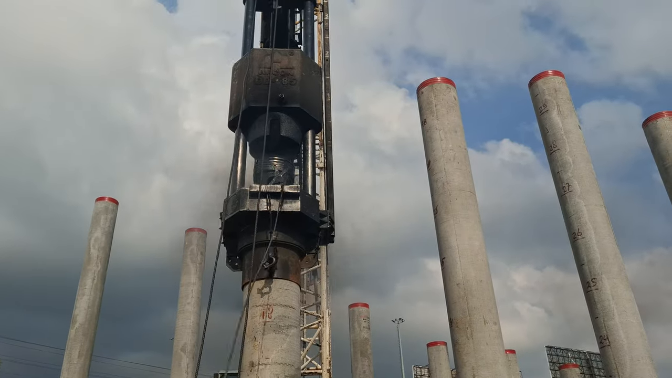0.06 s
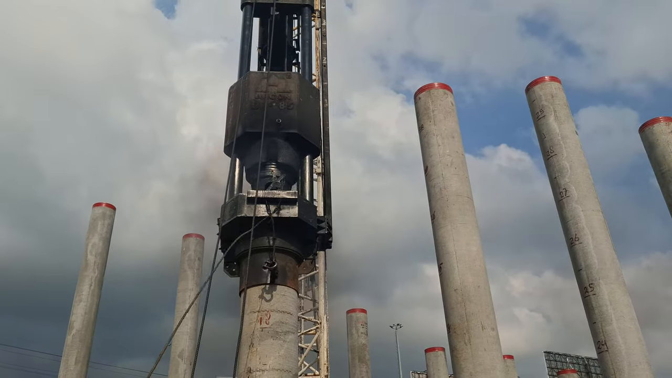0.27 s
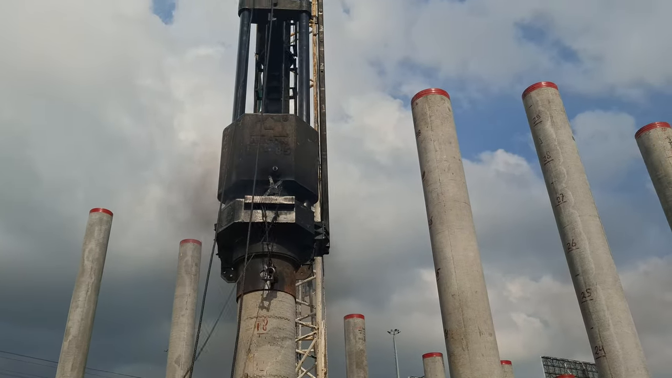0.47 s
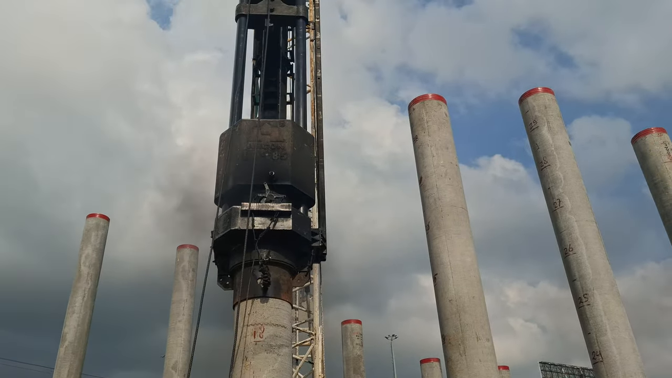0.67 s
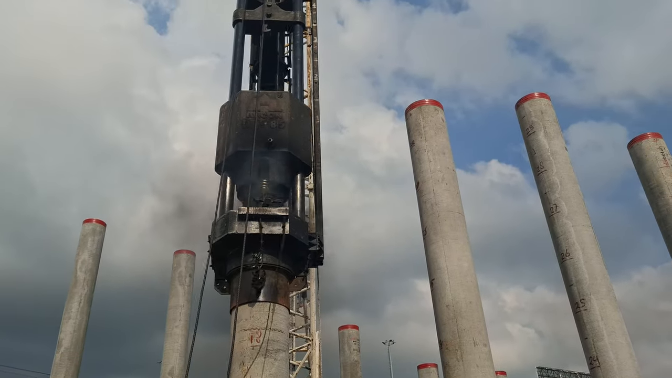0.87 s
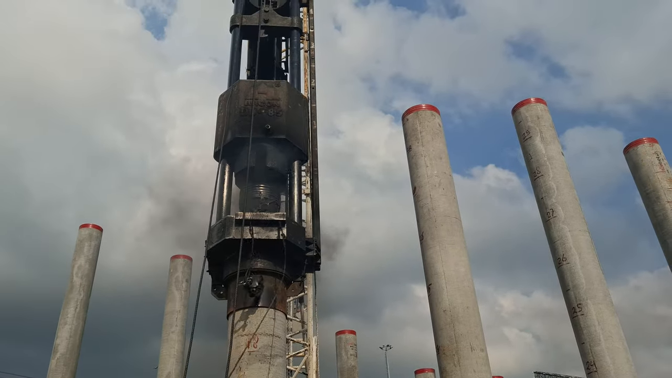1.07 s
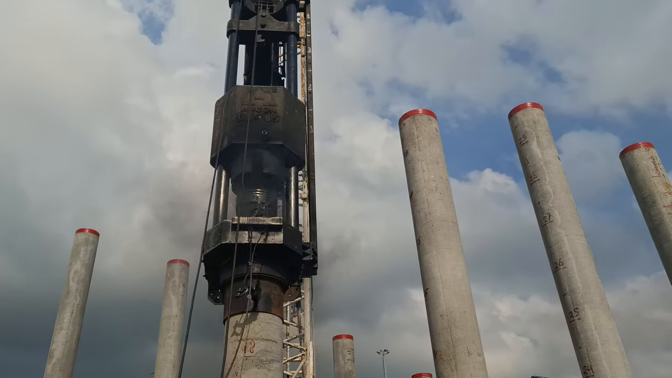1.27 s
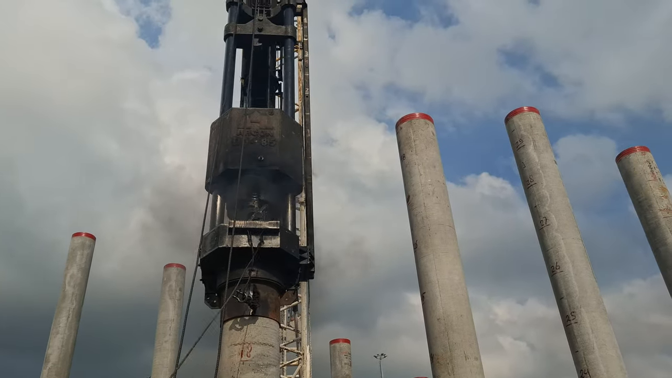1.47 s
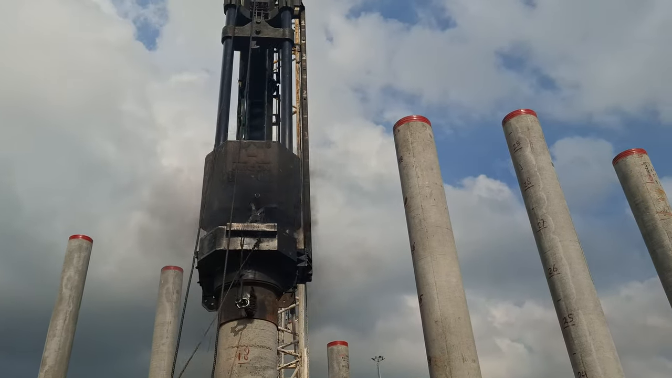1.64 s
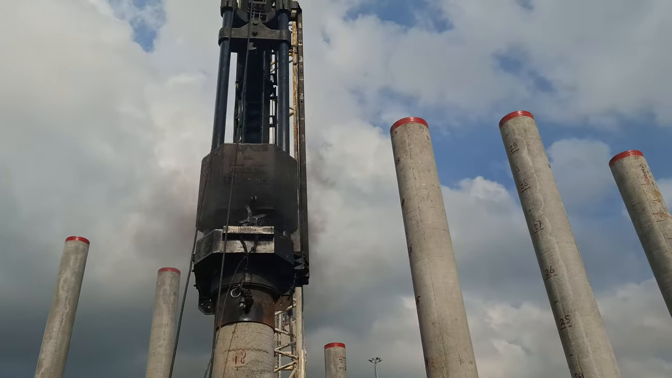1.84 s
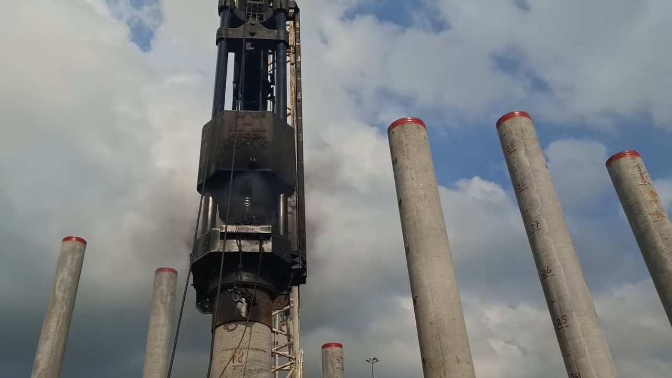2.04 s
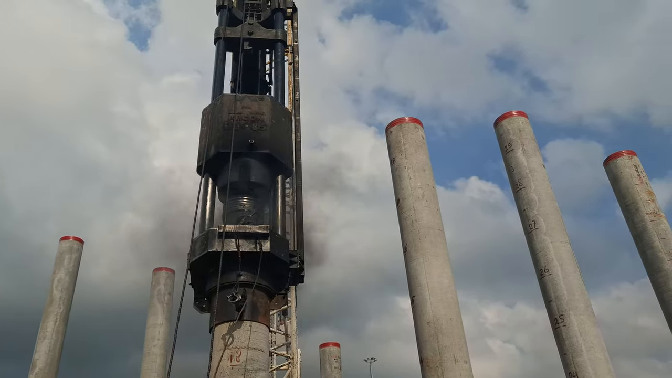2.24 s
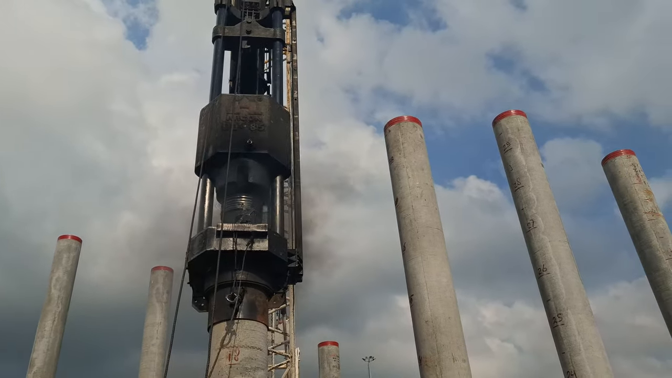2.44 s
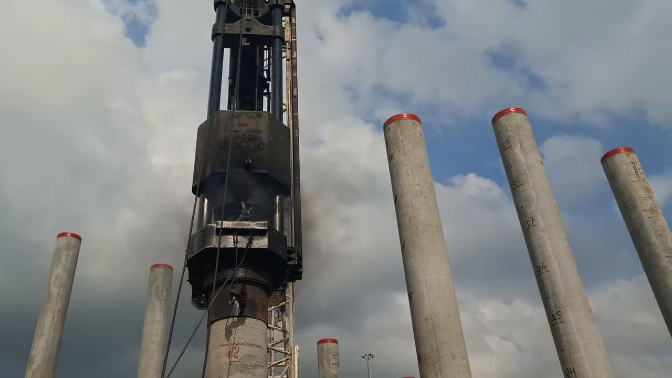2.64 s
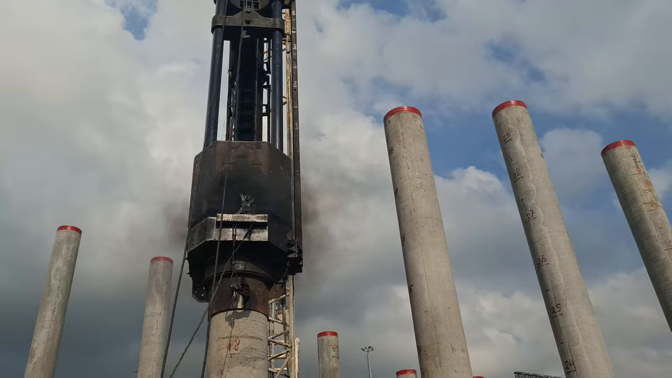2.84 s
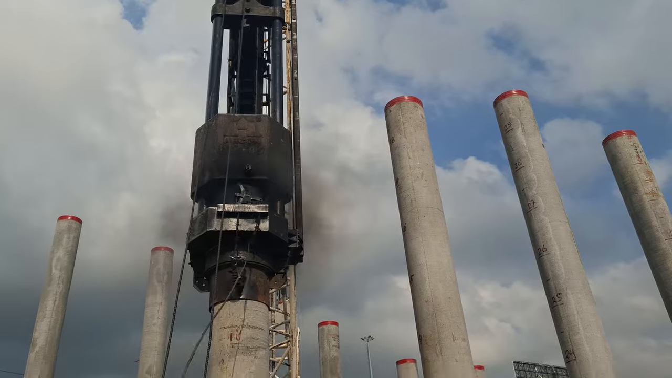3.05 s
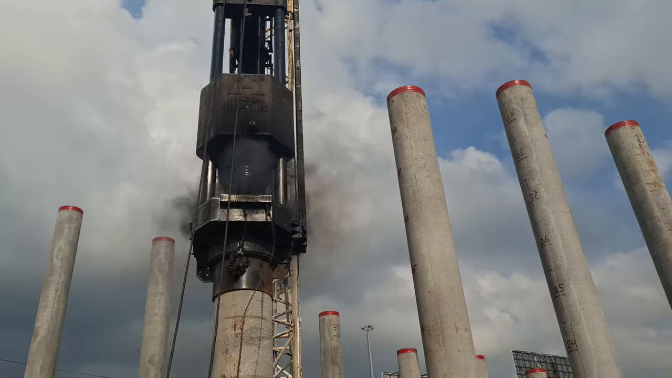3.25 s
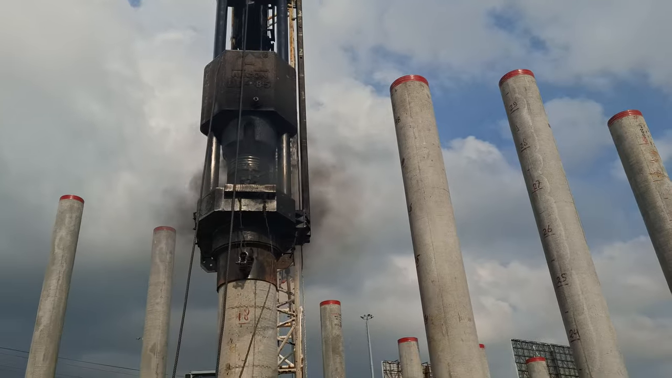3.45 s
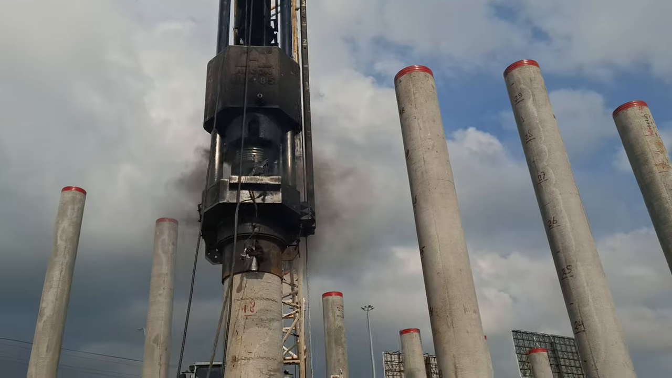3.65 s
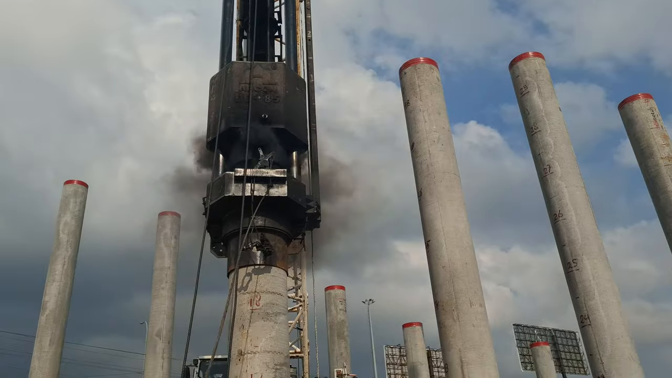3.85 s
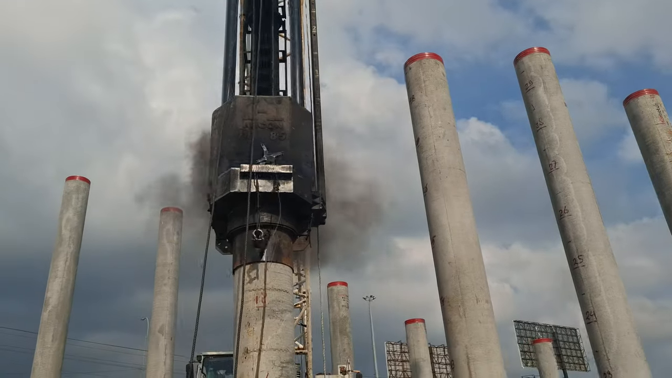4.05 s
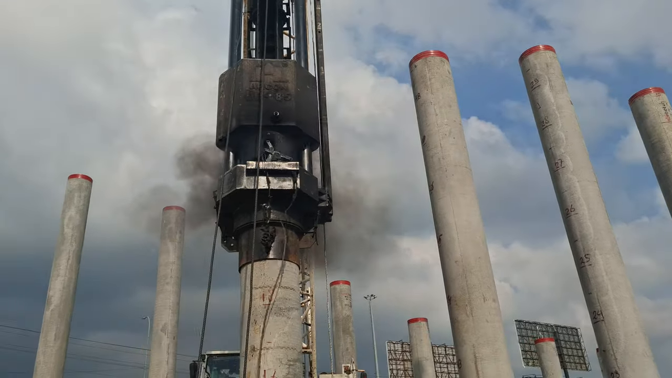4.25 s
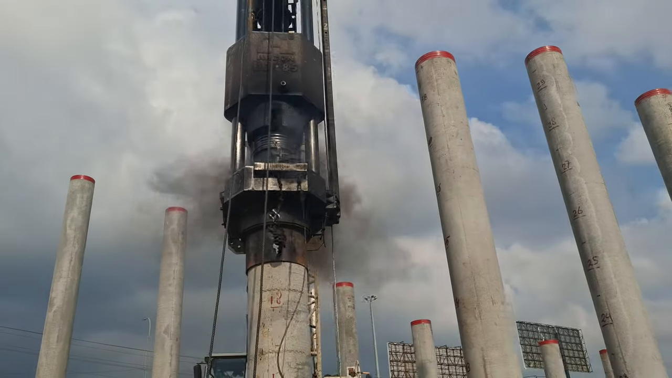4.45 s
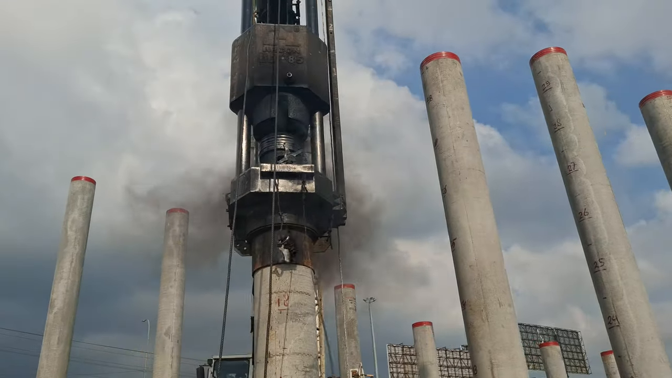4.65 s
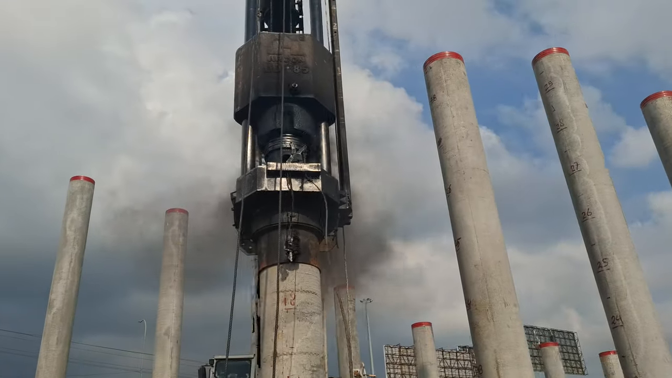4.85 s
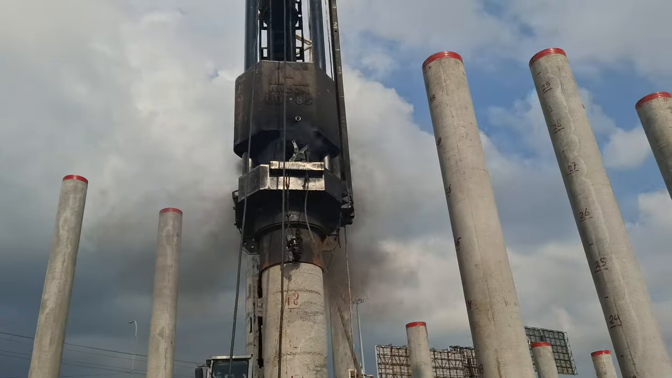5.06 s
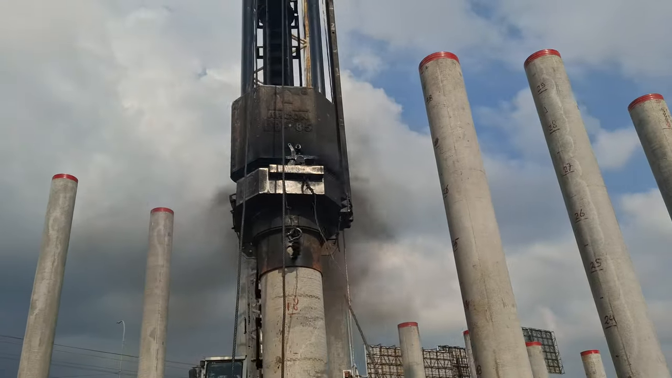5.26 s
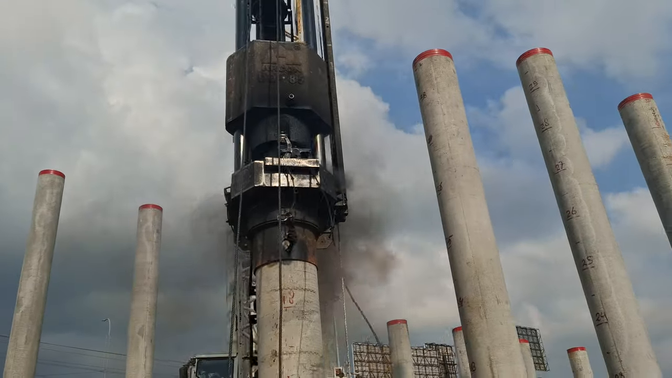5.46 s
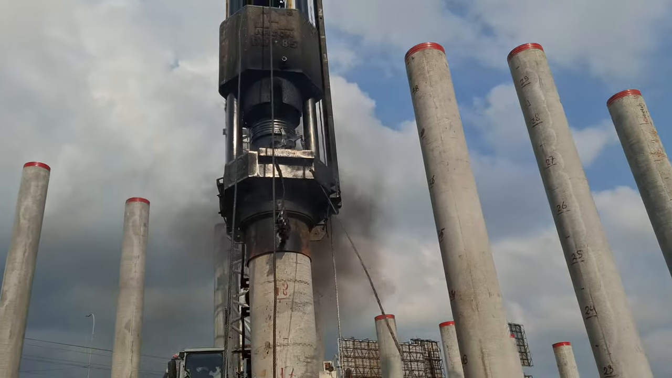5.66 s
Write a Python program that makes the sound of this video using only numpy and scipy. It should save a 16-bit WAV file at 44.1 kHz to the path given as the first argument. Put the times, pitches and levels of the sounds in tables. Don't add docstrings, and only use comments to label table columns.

```python
import sys
import numpy as np
from scipy import signal
from scipy.fft import rfft, irfft, next_fast_len
from scipy.io import wavfile
from scipy.ndimage import uniform_filter1d, map_coordinates

SR = 44100
rng = np.random.default_rng(int(sys.argv[2]) if len(sys.argv) > 2 else 0)


def voltage_ratio(decibels):
    exponent = np.asarray(decibels, float) / 20
    return 10 ** exponent


def master(y):
    cut = np.clip(np.atleast_2d(y).T, -1, 1)
    pcm = np.round(cut * 32767)
    wavfile.write(sys.argv[1], SR, pcm.astype(np.int16))


N = 252252
TIME = np.arange(N) / SR

# (time [s], peak [dB], low part [dB], high part [dB], boom [dB])
BLOWS = [
    (0.9022, -6.5, -0.5, -2.5, -31.5),
    (2.0857, -5.5, -1.5, -1, -27),
    (3.2473, -5.5, -3, -2.5, -25.5),
    (4.4016, -4.5, -0.5, -2.5, -27.5),
    (5.5437, -7.5, -0.5, -0.5, -33.5),
]


def unit(x):
    return x / np.sqrt(np.mean(x ** 2) + 1e-20)


def along(points, hz):
    f, v = np.transpose(points)
    return np.interp(np.log(hz + 1), np.log(f + 1), v)


def wobble(rate_hz):
    return map_coordinates(rng.standard_normal(int(N * rate_hz / SR) + 4), [TIME * rate_hz])


def filtered(x, response):
    size = next_fast_len(N + SR // 2)
    return irfft(rfft(x, size) * response(np.fft.rfftfreq(size, 1 / SR)), size)[..., :N]


def steel_noise(spectrum, patch_db, grit_db):
    impacts = voltage_ratio(grit_db * wobble(700)) * rng.standard_normal((2, N))
    z = signal.stft(impacts, nperseg=256)[2]
    parts = uniform_filter1d(rng.standard_normal(z.shape[1:]), size=2, axis=0)
    parts = uniform_filter1d(parts, size=10, axis=1)
    grit = signal.istft(z * voltage_ratio(patch_db * unit(parts)), nperseg=256)[1][:, :N]
    return unit(filtered(grit, lambda f: voltage_ratio(along(spectrum, f))))


def three_bands(gains, ring_db, patch_db, grit_db):
    # (frequency [Hz], density [dB per Hz])
    middle = [(900, -25), (1400, -4), (2000, 2), (3200, 1.5), (4700, 0.5), (5600, -8), (8000, -22)]
    low = [(60, -7), (150, -4), (300, -2), (650, 3), (930, 0.5), (1280, 0), (1700, -3.5), (2500, -28)]
    high = [(3500, -26), (5500, 11), (7000, 4), (8500, 4.5), (10500, -1.5), (13000, 0), (16000, -14)]
    # (frequency [Hz], width [Hz], level [dB])
    resonances = [(432, 39.6, -17), (595, 21, -9), (754, 16, -11.5), (914, 8.9, -29), (1157, 87, -9.5),
                  (1297, 31, -4), (1931, 69, -7), (2210, 5, -1), (2407, 7.9, -3), (2727, 23, -1.5),
                  (3024, 17, -6.5), (3567, 16, -7),
                  (4170, 17, -10), (4600, 14, -6.5), (6000, 18, -10.5), (6660, 33, -9), (8500, 36, -11.5),
                (9700, 30, -11), (11000, 38, -3.5), (12150, 63, -5)]
    force = np.zeros((2, N))
    for gain, band, share in zip(gains, (middle, low, high), (1, 1, .7)):
        force += gain * steel_noise(band, patch_db * share, grit_db)

    def response(f):
        ring = sum(voltage_ratio(db) * 1j * f * width / (hz * hz - f * f + 1j * f * width)
                   for hz, width, db in resonances)
        return 1 + voltage_ratio(ring_db) * ring
    return filtered(force, response)


def bursts(events, rise_s, hold_s, t60s, trim_db):
    power = np.zeros((3, N))
    for s, db, low_db, high_db, *_ in events:
        start = round(s * SR)
        t = TIME[:min(N - start, SR // 4)]
        rise = 1 - np.exp(-t / rise_s)
        for part, rel_db, t60 in zip(power, (0, low_db, high_db), t60s):
            level_db = db + rel_db + trim_db - 60 * np.clip(t - hold_s, 0, None) / t60
            part[start:start + len(t)] += (voltage_ratio(level_db) * rise) ** 2
    return power


def sliding(peaks, rule, fade_s, flutter_db, **grain):
    gains = np.zeros((3, N))
    for s, db, low_db, high_db in peaks:
        t = TIME - s
        for gain, rel_db, (swell_s, swell_db, hold_s, drop_db, release) in zip(gains, (0, low_db, high_db), rule):
            after = np.clip(t - hold_s, 0, None)
            shape_db = swell_db * np.clip(t / swell_s, -1, 0)
            shape_db = shape_db - drop_db * np.clip(after / .025, 0, 1) - release * after
            gain += np.clip((t + swell_s) / fade_s + 1, 0, 1) * voltage_ratio(db + rel_db + shape_db)
    flutter = np.array([wobble(45), wobble(30), wobble(70)])
    return three_bands(gains * voltage_ratio(flutter_db * flutter), **grain)


def ringing(s, modes, attack_s):
    out, start = np.zeros(N), round(s * SR)
    t = TIME[:min(N - start, round(SR * max(mode[2] for mode in modes)))]
    tones = sum(voltage_ratio(db - 60 * t / t60) * np.sin(2 * np.pi * hz * t) for hz, db, t60 in modes)
    out[start:start + len(t)] = (1 - np.exp(-t / attack_s)) * tones
    return out


def site():
    # (time [s], level [dB])
    rumble = [(0, -62), (.8, -47), (1.6, -61.5), (2.6, -44), (3.7, -41), (4.3, -37), (5.3, -43.5),
              (5.72, -39)]
    # (time [s], plant [dB], far clatter [dB])
    steady = [(0, -41, -46.5), (.4, -52, -57), (1, -51, -45.5), (1.548, -50, -53.5), (2.5, -44, -50),
              (3.699, -44.5, -46.5), (4.802, -46, -45), (5.72, -41.5, -38)]
    # (frequency [Hz], density [dB per Hz])
    ground_colour = [(18, -28), (35, -14.5), (60, 10), (80, 0.5), (110, -6.5), (200, -92)]
    plant_colour = [(60, -54), (110, 7), (200, -0.5), (400, -12.5), (700, -11), (1200, -45.5)]
    far_colour = [(180, -44), (300, -6), (343, -2), (3290, -20.5), (3830, -21.5), (6520, -26.5),
                  (8360, -34), (16000, -66)]
    s, plant_db, far_db = np.transpose(steady)
    blow_s = np.array([-.36] + [blow[0] for blow in BLOWS])
    since = TIME - blow_s[:, None]

    def stir(db, delay_s, t60_s):
        t = since - delay_s
        return np.sum(np.clip(t / 0.026, 0, 1) * voltage_ratio(db - 60 * np.abs(t) / t60_s), axis=0)

    ground = voltage_ratio(np.interp(TIME, *np.transpose(rumble))) + stir(-28, 0.071, 1.12)
    roar = stir(-26.5, -0.054, 0.36)
    plant = voltage_ratio(np.interp(TIME, s, plant_db)) + stir(-47, 0.14, 0.63) + roar
    far = voltage_ratio(np.interp(TIME, s, far_db)) + stir(-47.5, 0.13, 0.63)
    out = np.zeros((2, N))
    for gain, colour, patch_db in ((ground, ground_colour, 0), (plant, plant_colour, 2), (far, far_colour, 1)):
        out += gain * voltage_ratio(2.2 * wobble(14)) * steel_noise(colour, patch_db, grit_db=0)
    return out


def loose_pings():
    # (time [s], frequency [Hz], level [dB], t60 [s])
    pings = [(.075, 11000, -58, 0.11), (.16, 63, -25.5, 0.11), (0.193, 12050, -41.5, 0.067),
             (.235, 2180, -47, 0.12), (.3, 7800, -49, 0.06), (.357, 2210, -31, 0.039),
             (.372, 2100, -41.5, 0.12), (0.362, 60, -31, 0.11), (.8, 11350, -35, 0.24),
             (1.052, 2675, -22, 0.053), (1.301, 3830, -53, 0.6), (1.715, 7800, -43, 0.12),
             (2.088, 3570, 2.5, 0.02), (2.251, 1237, -26.5, 0.22), (3.04, 11500, -42, 0.14),
             (3.117, 2630, -18, 0.12), (3.349, 1610, -12.5, 0.037), (3.919, 8770, -18, 0.016),
             (3.92, 6250, -25, 0.026), (4.094, 3110, -8, 0.052), (4.18, 11200, -30, 0.14),
             (4.276, 2620, -15.5, 0.095), (4.36, 9700, -39, 0.075), (4.92, 9700, -51, 0.14),
             (5.35, 11500, -22, 0.13), (5.349, 4470, -19, 0.21), (5.415, 2680, -20.5, 0.17),
             (3.5, 11300, -51, .1)]
    return sum(ringing(s, [mode], 0.0045) for s, *mode in pings) * voltage_ratio(1.9 * wobble(90))


def loose_rattle():
    # (time [s], level [dB])
    shakes = [
        (-.26, -33),
        (0.9, -33),
        (2.086, -31.5),
        (3.247, -31),
        (4.4, -32),
        (5.5457, -33),
    ]
    # (swell [s], swell [dB], hold [s], drop [dB], release [dB per s])
    rattle_rule = [(.04, 3, .072, 7, 70), (.04, 1, .08, 3, 60), (.04, 8, .075, 8, 65)]
    peaks = [(s + .085, db, -9, -5) for s, db in shakes]
    return sliding(peaks, rattle_rule, .02, 2.4, ring_db=10, patch_db=4.3, grit_db=3.5)


def small_ticks():
    # (time [s], peak [dB], low part [dB], high part [dB])
    ticks = [(0.858, -22, 1, 11.5), (2.041, -21, 3, 5.5), (2.91, -34, -13, 7), (3.2064, -20.5, -2, 7),
             (3.7589, -25.5, -3, -12), (4.172, -12, -5, -7), (4.3554, -16.5, -7, 4.5),
             (5.502, -10, -8, -0.5)]
    return bursts(ticks, 0.0025, 0.0017, (.06, .08, .04), -12.5)


def hard_snaps():
    # (time [s], level [dB])
    cracks = [(.4495, -10), (.717, -17), (.9065, -12), (1.633, -11), (2.0885, -9), (2.772, -8),
              (3.042, -14), (3.9195, -8), (3.943, -12), (4.4215, -9), (5.09, -18), (5.559, -10)]
    return sum(ringing(s, [(1510, db, 0.0047), (4100, db - 17, 0.0013), (9900, db - 3, 0.0037)], .0001)
               for s, db in cracks)


def fuel_lever():
    # (time [s], peak [dB], low part [dB], high part [dB])
    lever = [
        (0.0272, -24, 0, -7),
        (1.1956, -26, 0.5, -5.5),
        (3.6164, -21.5, 1, -6.5),
        (4.779, -20, -3, -11.5),
    ]
    # (frequency [Hz], level [dB], t60 [s])
    lever_modes = [(355, -13, .2), (703, -10, .42), (940, -12, .15), (1175, -5, .2), (1215, -6, .15),
                   (2290, -12, .17), (2950, -6, .12), (3817, -17, .1), (4560, -7, .09), (4750, -12, .09)]
    ring = np.zeros(N)
    for s, db, low_db, _ in lever:
        modes = [(hz, level_db + rng.normal(0, 1.2), t60) for hz, level_db, t60 in lever_modes]
        ring += voltage_ratio(db + low_db + 2) * ringing(s, modes, .005) * voltage_ratio(2.2 * wobble(60))
    return bursts(lever, 0.00042, 0.0046, (.12, .15, .05), -6.5), ring


def guide_clanks():
    # (time [s], peak [dB], low part [dB], high part [dB], knock [Hz])
    clanks = [(0.4422, -16, 9.5, -9, 580), (0.449, -14, -10, -10, 1280), (0.4608, -11, -2, -4, 850),
              (0.474, -17, 3, -4.5, 1220), (1.6125, -14, 4, -4.5, 745), (1.6255, -16, 10.5, 6, 1390),
              (1.6286, -9.5, -0.5, -13, 1300), (1.642, -18, -11, -17, 1240), (2.7653, -5, -3, 2.5, 1150),
              (2.773, -5.5, -3, -19, 800), (2.7798, -11.5, 5.5, 4.5, 1310), (2.7896, -9, -2, -15, 1280),
              (3.917, -10, -1.5, 3.5, 670), (3.933, -11, 4, -13, 2080), (3.9404, -8, -1.5, -6.5, 1070),
              (3.952, -12.5, 0.5, -11, 1300), (3.9664, -18, -8, -4, 619), (5.079, -14.5, 3.5, -9, 607),
              (5.0865, -15.5, 12, -6.5, 850), (5.1, -6.5, -9, -12.5, 1260), (5.1162, -21, 2.5, -15, 950)]
    # (time [s], level [dB])
    braking = [
        (.426, -20),
        (1.592, -17),
        (2.748, -13),
        (3.902, -14),
        (5.058, -16),
    ]
    power = bursts(clanks, 0.0016, 0.0024, (.05, .09, .035), -10)
    power += bursts([(s, db - 6, 7, -26) for s, db in braking], .12, .019, (.03, .03, .03), 0)
    ring = np.zeros(N)
    for s, db, low_db, _, hz in clanks:
        modes = [(hz, -11, .05), (1500, -11, .05), (1850, -12, .05), (160, -16, .08)]
        ring += voltage_ratio(db + low_db) * ringing(s, modes, 0.0029)
    return power, ring


def port_pops():
    # (time [s], peak [dB], low part [dB], high part [dB])
    pops = [
        (0.603, -10, -10.5, -4.5),
        (1.7774, -9.5, -19, -3.5),
        (2.9382, -8, -11.5, -2),
        (4.0928, -8, -8, -8.5),
        (5.2472, -8, -10, -3),
    ]
    return bursts(pops, 0.00044, 0.0084, (.07, .12, .06), -11)


def cylinder_grind():
    # (time [s], level [dB], low part [dB], high part [dB])
    slides = [
        (.69, -23, -9, -17),
        (1.87, -22, -6.5, -14),
        (3.04, -21.5, -6.5, -14),
        (4.195, -21, -6.5, -14.5),
        (5.35, -23, -5, -11.5),
    ]
    # (swell [s], swell [dB], hold [s], drop [dB], release [dB per s])
    grind_rule = [(0.082, 20.5, 0.011, 3.5, 76), (0.0845, 7.5, .02, 0.5, 72), (0.038, 4.5, 0.066, 2.5, 80)]
    return sliding(slides, grind_rule, .008, 1.4, ring_db=13, patch_db=4.3, grit_db=3)


def boom():
    # (frequency [Hz], level [dB], t60 [s])
    pile = [(60.2, 4, 0.35), (64, -18, 0.17), (50.5, -30, 0.29), (190, -18, 0.43)]
    return -sum(voltage_ratio(boom_db + 13.5) * ringing(s + 0.03504, pile, 0.011) for s, *_, boom_db in BLOWS)


def anvil_blows():
    load_s = 0.044
    load = [(s - load_s, db - 34, 11, -8) for s, db, *_ in BLOWS]
    squeeze = [(s - .014, db - 19, low_db - 3, high_db - 6) for s, db, low_db, high_db, _ in BLOWS]
    rebounds = [(s + .147, db - 11, -13, -10) for s, db, *_ in BLOWS]
    power = bursts([*BLOWS, *squeeze], 0.0019, 0.017, (.07, .12, .05), -9)
    power += bursts(load, .03, load_s, (.03, .05, .03), 0)
    power += bursts(rebounds, .002, .012, (.05, .06, .04), -6)
    modes = [(119.6, -18.5, 0.21), (192.7, -15.5, 0.17), (442.6, -9, 0.12)]
    ring = sum(voltage_ratio(db) * ringing(s, modes, 0.016) for s, db, *_ in BLOWS)
    return power, ring


def contacts():
    lever_power, lever_ring = fuel_lever()
    clank_power, clank_ring = guide_clanks()
    blow_power, blow_ring = anvil_blows()
    power = small_ticks() + lever_power + clank_power + port_pops() + blow_power
    ring = loose_pings() + hard_snaps() + lever_ring + clank_ring + blow_ring
    return three_bands(np.sqrt(power), ring_db=6, patch_db=3, grit_db=2.6) + ring * [[1], [.4]]


def echoes(x):
    # (frequency [Hz], level [dB])
    wall = [(100, -8), (800, -12), (2500, 5.5), (5000, -12), (9000, -13), (16000, -15)]
    # (frequency [Hz], t60 [s])
    yard_t60 = [(100, 0.67), (800, 0.38), (3000, 0.38), (10000, 0.33)]
    slap = filtered(x, lambda f: voltage_ratio(along(wall, f) - 23) * np.exp(-2j * np.pi * f * .144))
    hz, t, z = signal.stft(rng.standard_normal((2, SR // 2)), SR, nperseg=256)
    tail = signal.istft(z * voltage_ratio(-60 * t / along(yard_t60, hz)[:, None]), SR, nperseg=256)[1]
    yard = signal.fftconvolve(x, tail / np.linalg.norm(tail[0]), axes=1)[:, :N]
    return slap + voltage_ratio(-13) * yard


def stereo(pair):
    # (frequency [Hz], left-right correlation)
    alike = [(60, .95), (500, .95), (1500, .86), (4000, .68), (6000, .6), (12000, .6)]
    # (frequency [Hz], phase [rad])
    left_lead = [(30, 0.24), (500, 0.49), (1800, 1.3), (3200, 0.98), (4800, 1.74), (5500, 3.37),
                 (8300, 4.93), (16000, 4.4)]
    # (frequency [Hz], level [dB])
    left_louder = [(60, 0.2), (1000, 0.4), (4000, -0.5), (12000, -0.6)]

    def split(f):
        angle = np.arccos(np.clip(along(alike, f), -1, 1)) / 2
        return [np.cos(angle), np.sin(angle)]

    shared, apart = filtered(pair, split)
    half = np.array([[.5], [-.5]])
    return filtered(np.array([shared + apart, shared - apart]),
                    lambda f: np.exp(1j * along(left_lead, f) * half) * voltage_ratio(along(left_louder, f) * half))


def scene():
    knocks = contacts()
    pair = site() + loose_rattle() + cylinder_grind() + boom() * [[1], [.5]] + knocks + echoes(knocks)
    return stereo(pair)


def top_cut(x):
    return signal.sosfilt(signal.butter(12, 16610, fs=SR, output="sos"), x)


def record(dry):
    x = dry / (1 + np.abs(dry / .95) ** 6) ** (1 / 6)
    x = filtered(x, lambda f: 1 / (1 + (f / 15950) ** 90))
    return top_cut(x)


dry = scene()
out = record(dry)
master(out)
```